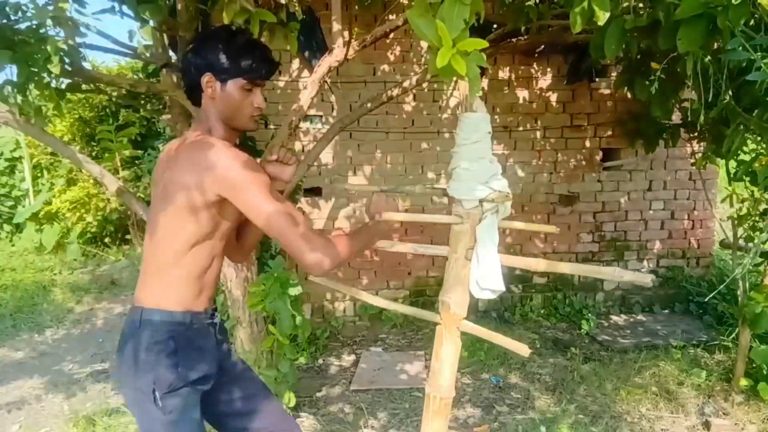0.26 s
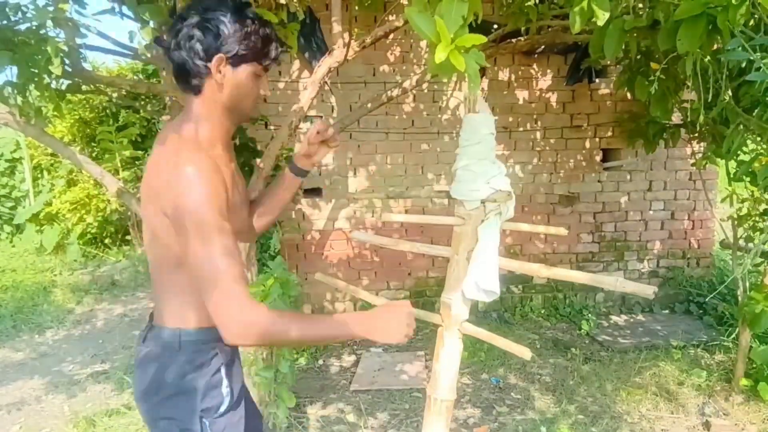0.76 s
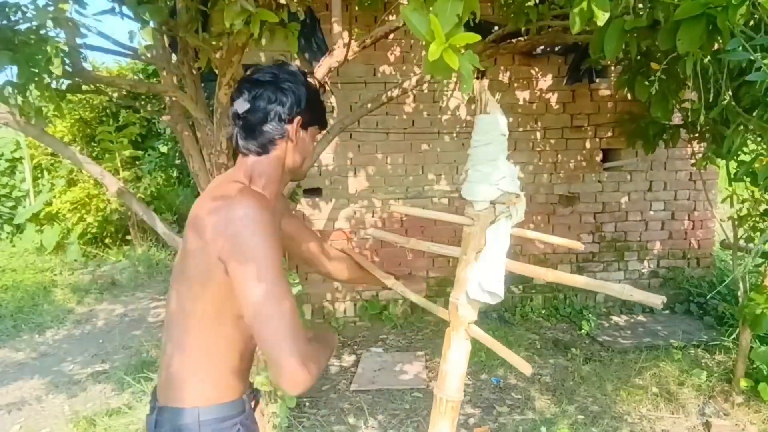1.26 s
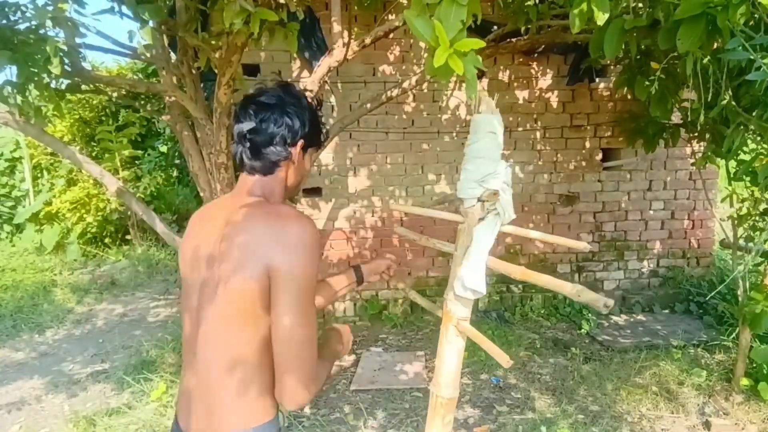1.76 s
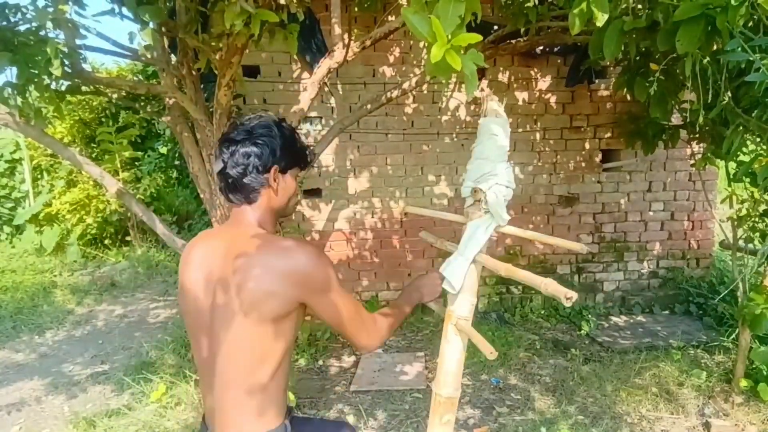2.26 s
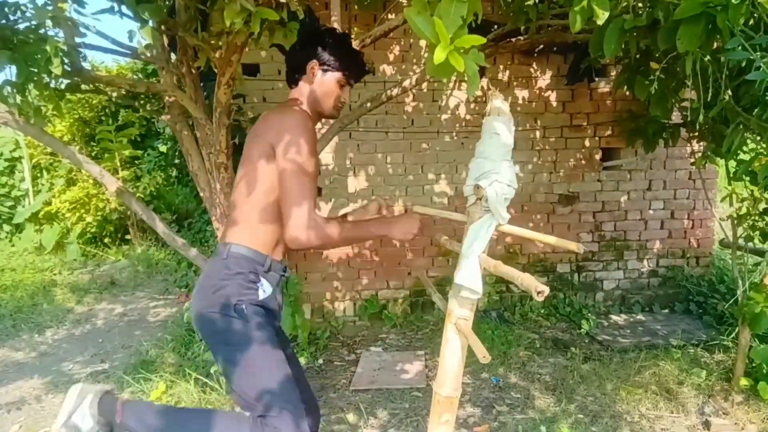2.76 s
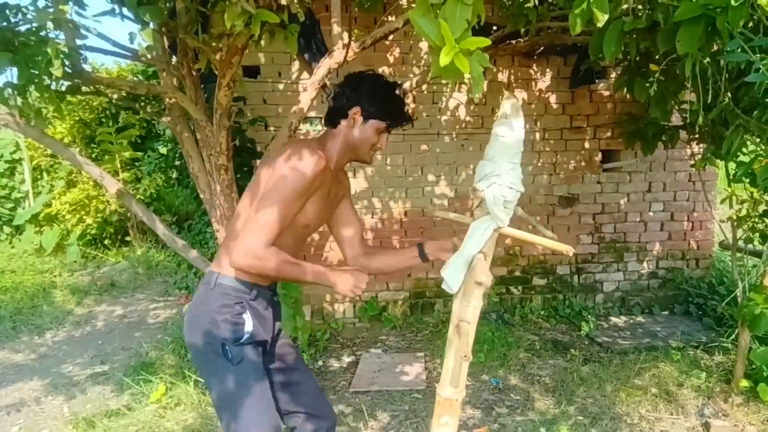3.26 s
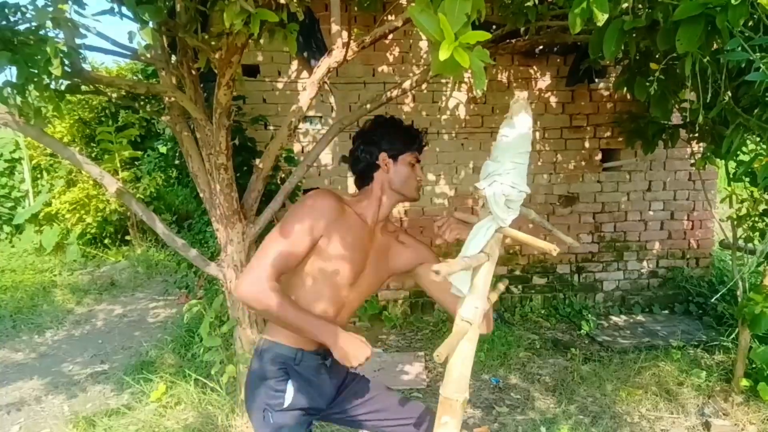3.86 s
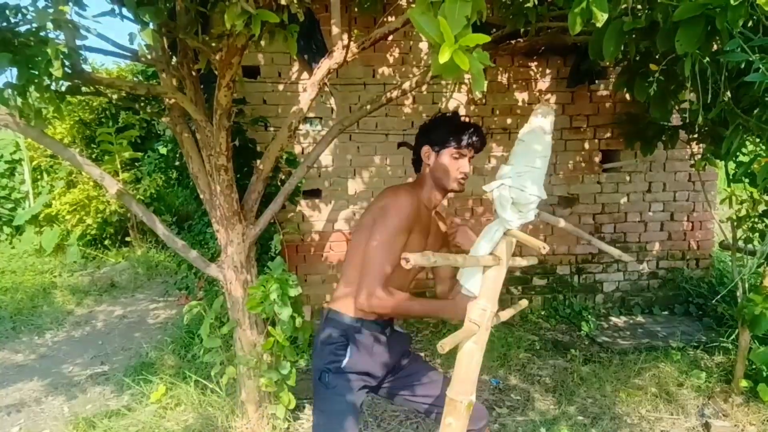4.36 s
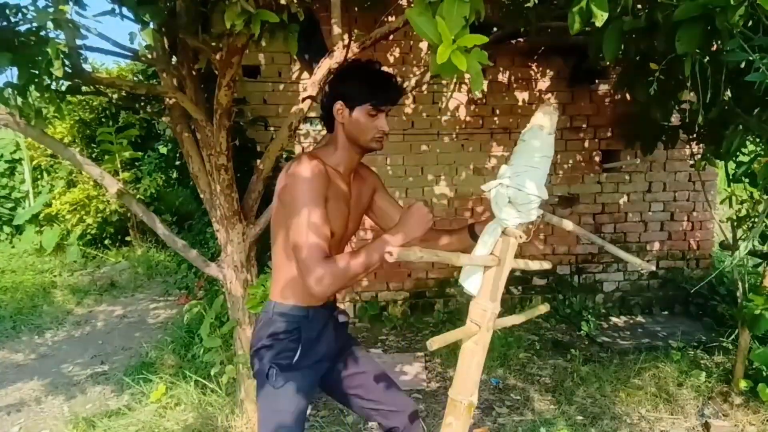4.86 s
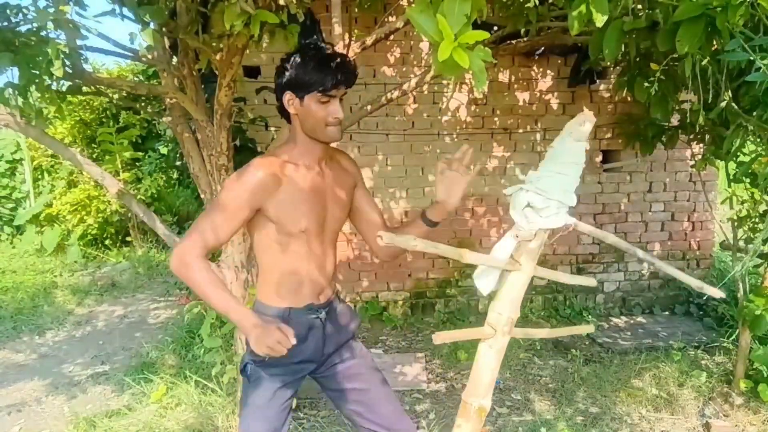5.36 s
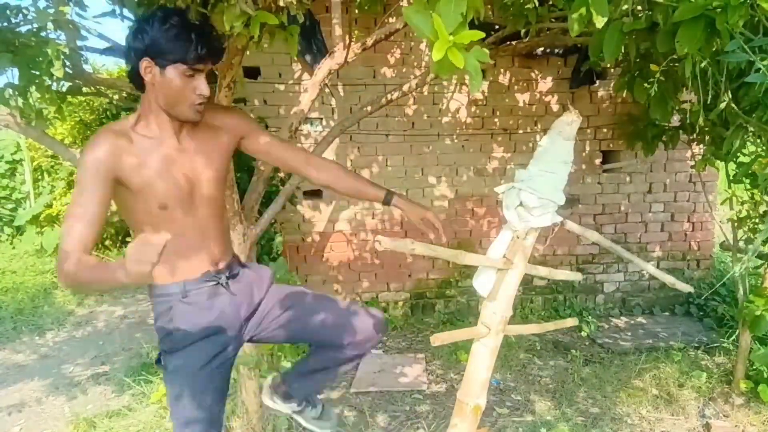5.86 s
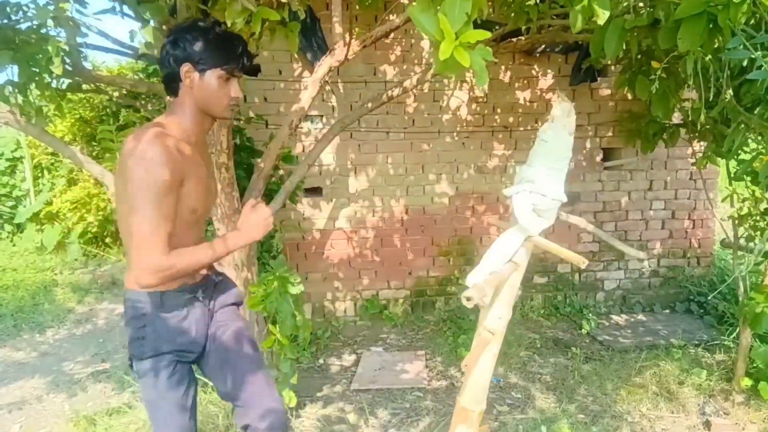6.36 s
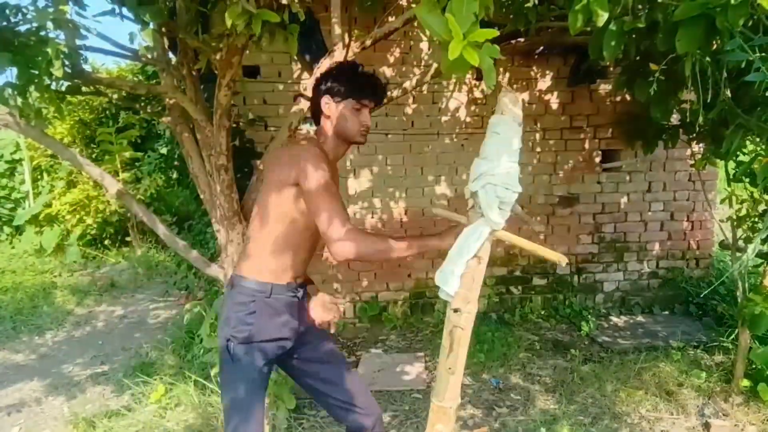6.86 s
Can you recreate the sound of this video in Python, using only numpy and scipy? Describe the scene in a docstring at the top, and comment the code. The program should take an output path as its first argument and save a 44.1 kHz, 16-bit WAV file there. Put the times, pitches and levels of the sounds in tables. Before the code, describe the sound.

Sharp dry wooden knocks and rattles come in quick uneven bursts outdoors, over fast high bird trills, cloth swishes and low wind rumble.

```python
"""Bamboo training dummy in a yard

A man strikes a bamboo dummy close to a brick wall: each push and its rattle ring a set of damped modes.
Between blows, feet and trousers swish through the grass as swells of coloured noise with sharp snaps.
Small birds repeat quick falling chirps, made of gliding sines, over the flickering noise bands of a far
bird chorus and a faint high hiss. A breeze buffets the microphone as lumpy low noise, separate at each port;
the right port is muffled."""
import sys
import numpy as np
from scipy import signal
from scipy.fft import rfft, irfft
from scipy.io import wavfile

SR = 44100
rng = np.random.default_rng(int(sys.argv[2]) if len(sys.argv) > 2 else 0)


def dump_mix(stems):
    """Bounce the given channels to the path in sys.argv[1] as a 16-bit WAV at rate SR."""
    frames = np.atleast_2d(stems).T  # one column per channel
    limited = np.clip(frames, -1, 1)  # hard clip at full scale
    pcm = np.round(limited * 32767).astype(np.int16)
    wavfile.write(sys.argv[1], SR, pcm)


N = 313992
TIME = np.arange(N) / SR


def from_db(db):
    """Decibels to gain."""
    return 10 ** (np.asarray(db) / 20)


def rms_one(x):
    """Scale to unit power."""
    return x / np.sqrt(np.mean(x ** 2) + 1e-20)


def unit_energy(x):
    """Scale to unit energy."""
    return x / np.linalg.norm(x)


def at_hz(points, hz):
    """Read a spectrum on a log-frequency axis."""
    known_hz, values = np.transpose(points)
    return np.interp(np.log(np.maximum(hz, 1)), np.log(known_hz), values)


def add(track, s, sound):
    """Mix a sound in from time s on."""
    start = max(int(round(s * SR)), 0)
    part = sound[:max(N - start, 0)]
    track[start:start + len(part)] += part


def drift(rate):
    """Random wander of unit power through `rate` new values per second."""
    knots = rng.standard_normal(4096)
    return rms_one(np.interp(TIME * rate, np.arange(len(knots)), knots))


def coloured(x, spectrum):
    """Causal (minimum-phase) filter with the given (f/Hz, level/dB) response."""
    size = 2048
    log_gain = np.log(from_db(at_hz(spectrum, np.fft.rfftfreq(size, 1 / SR))))
    cepstrum = irfft(log_gain)
    # fold the cepstrum onto positive time for minimum phase
    cepstrum[1:size // 2] *= 2
    cepstrum[size // 2 + 1:] = 0
    impulse = irfft(np.exp(rfft(cepstrum)))
    return signal.oaconvolve(x, impulse)[:len(x)]


def noise(spectrum, size=N):
    """Noise of unit power with the given spectrum."""
    run_in = 2048
    return rms_one(coloured(rng.standard_normal(size + run_in), spectrum)[run_in:])


def ring(t, hz, t60):
    """A struck mode: a decaying cosine of unit energy."""
    return unit_energy(np.cos(2 * np.pi * hz * t) * from_db(-60 * t / t60))


def scatter(t, t60, onset_s):
    """Dense reflections of unit energy that swell briefly and die away."""
    decay = from_db(-60 * t / t60)
    swell = 1 - np.exp(-t / onset_s)
    return unit_energy(rng.standard_normal(len(t)) * decay * swell)


# modes of the post and its arms: f/Hz, level/dB (relative), t60/s
BAMBOO_MODES = [(272, 0, 0.06), (353, -0.5, 0.023), (459, 0.5, 0.027), (656, -13, 0.064),
                (720, -5.5, 0.029), (1050, -1, 0.017), (1160, -14.5, 0.011), (1332, -7.5, 0.05),
                (1455, -17, 0.024), (1943, -3.5, 0.011), (2790, 4, 0.0049)]


def struck_bamboo(note_hz, ring_db, rattle_db, t):
    """The struck part's note, its bending overtones and the fixed modes of the dummy answer a sharp push."""
    modes_db, overtone_db = -17, -7
    # an arm that the hand leaves at once rings louder and, up to -5 dB, longer
    t60 = 0.11 * from_db(0.69 * min(ring_db, -5))
    push = 1.0 * (t == 0)
    body = push + from_db(ring_db) * ring(t, note_hz, t60)
    # the higher the bending mode, the sooner it dies
    for ratio in (1.77, 2.8, 3.73):
        overtone_hz = ratio * note_hz
        body += from_db(ring_db + overtone_db) * ring(t, overtone_hz, t60 * 1300 / overtone_hz)
    for hz, db, mode_t60 in BAMBOO_MODES:
        body += from_db(modes_db + db + rng.normal(0, 1.17)) * ring(t, hz, mode_t60)
    return body


def contact_force(rattle_db, t):
    """A push, its rattle in the socket and the knock of the loose arm coming back."""
    # a glancing blow scuffs and rattles for longer than a square one
    scuff_t60 = 0.051 * from_db(0.57 * rattle_db)
    force = 1.0 * (t == 0) + from_db(rattle_db) * scatter(t, scuff_t60, onset_s=.0013)
    # the loose arm knocks back against its socket a few milliseconds later
    rebound_s = .008 * rng.uniform(0.692, 1.3)
    force += from_db(-12 + .5 * rattle_db) * np.sinc((t - rebound_s) * SR)
    return unit_energy(force)


# what ground, wall and leaves throw back: f/Hz, level/dB
REFLECTED_COLOUR = [(200, 0), (1200, -2.5), (3000, -2), (6000, 0), (12000, -31)]


def surroundings(t):
    """One early bounce off the ground, the swelling return of the wall and a longer tail, all duller."""
    ground_s = .0045 * rng.uniform(0.737, 1.7)
    echoes = from_db(-10) * np.sinc((t - ground_s) * SR)
    echoes += from_db(-12) * scatter(t, t60=0.09, onset_s=0.036)
    echoes += from_db(-19) * scatter(t, t60=0.27, onset_s=0.0066)
    return coloured(echoes, REFLECTED_COLOUR)


def blow(note_hz, ring_db, rattle_db):
    """The contact force and its reflections set the bamboo ringing."""
    t = np.arange(2 ** 14) / SR
    body = struck_bamboo(note_hz, ring_db, rattle_db, t)
    excitation = contact_force(rattle_db, t) + surroundings(t)
    return signal.fftconvolve(body, excitation)[:len(t)]


def contact(centre_hz, rise_db, fall_db):
    """Contact spectrum: bone peaks high and falls steeply, a palm or sole slaps broadly (f/Hz, level/dB)."""
    # the light poles radiate little bass: corner (Hz), loss below it (dB per octave)
    radiation_hz, radiation_loss_db = 250, 12
    hz = np.geomspace(40, 16000, 64)
    octaves = np.log2(hz / centre_hz)
    db = rise_db * np.minimum(octaves, 0) - fall_db * np.maximum(octaves, 0)
    db += radiation_loss_db * np.minimum(np.log2(hz / radiation_hz), 0)
    return np.transpose([hz, db])


# blows on the dummy: t/s, level/dB, struck part's note f/Hz, its ring level/dB, rattle and scuff level/dB,
# contact's corner f/Hz, slope below it [dB per octave, rising], slope above it [dB per octave, falling]
DUMMY_BLOWS = [(.232, -42, 807, -9, -4, 1530, 4, 6.5), (0.3076, -22.5, 726, 3, -10, 2900, 0.5, 18),
               (.665, -27.5, 650, -14.5, -0.5, 520, 14, 10.5), (0.9351, -27.5, 740, -19, 0.5, 1250, 0, 11),
               (1.309, -40, 467, -13, -1, 4410, 5.5, 11), (1.548, -34, 513, -22, 4, 530, 8, 7.5),
               (1.8499, -21, 2057, -9.5, -13.5, 3260, 7, 34), (2.035, -20.3, 1280, -22, -5, 1330, 10, 16.5),
               (2.2257, -23, 2020, -21.5, -2, 2080, 8.5, 23), (2.3761, -23.5, 1320, -17, -5, 1570, 11, 17),
               (2.5592, -22.5, 1834, -9.5, -6, 2320, 3, 24), (2.7177, -28.5, 926, -13, -2.5, 1900, 6.5, 28),
               (2.942, -25.5, 1790, -10.5, 5.5, 2290, 4, 24),
               (3.1576, -31.5, 710, -17, -1.5, 1960, 3.5, 24), (3.3896, -25, 1690, -17, 6, 1970, 6.5, 30),
               (3.458, -34.5, 530, -13, -1.5, 3900, -3.5, 8), (3.593, -31.5, 1792, -13, -2, 1770, 7, 29),
               (3.6905, -41.5, 1080, -9.5, -6, 3230, -.5, 32), (3.8968, -42.5, 1123, -15, 9, 2670, -1, 9),
               (4.1782, -23.5, 463, -14, 3.5, 990, -1.5, 9.5), (4.905, -35.5, 1160, -2, 12.5, 3000, -2, 17),
               (4.98, -40.5, 1720, -12, -9, 1730, 3.5, 17), (5.06, -37.5, 1170, -7, 1.5, 1400, -2, 8),
               (5.296, -32.5, 1146, -5, 5, 3970, -3.5, 10.5), (5.585, -23, 466, -16, -4.5, 2670, -3.5, 9.5),
               (6.1463, -20.5, 840, -18.5, -7, 915, 9.5, 9.5), (6.2276, -33.5, 1200, -3, 1, 880, 8, 10),
               (6.738, -41.5, 565, -14, 2, 2000, -3, 21), (6.996, -32.5, 710, -12, 12.5, 1770, 2.5, 19)]


def dummy():
    """All the blows, each coloured by its contact and set to its own energy."""
    level_span_s = .03  # a blow's level is its energy spread over this time
    out = np.zeros(N)
    for s, db, note_hz, ring_db, rattle_db, centre_hz, rise_db, fall_db in DUMMY_BLOWS:
        sound = coloured(blow(note_hz, ring_db, rattle_db), contact(centre_hz, rise_db, fall_db))
        add(out, s, from_db(db) * np.sqrt(level_span_s * SR) * unit_energy(sound))
    return out


# feet and cloth: middle t/s, half length t/s, level/dB (before the trim), treble tilt [dB per octave]
MOVES = [(0.245, 0.0089, -42, -3), (0.292, 0.018, -38, -3.5), (0.494, 0.18, -50, 5),
         (0.621, 0.058, -41.5, 5), (0.977, 0.0088, -43, 7), (1.326, 0.0065, -32.5, -2),
         (1.581, 0.047, -40, -0.5), (1.67, 0.07, -40, 3), (1.773, 0.019, -31, 3), (1.81, 0.029, -36.5, 1.5),
         (2.586, 0.022, -33.5, -2), (2.647, 0.04, -37, 2.5), (2.783, 0.075, -43, -3),
         (3.057, 0.038, -45, 2), (3.177, 0.022, -39, -1), (3.464, 0.02, -35.5, 0),
         (3.931, 0.025, -39, -3.5), (4.072, 0.02, -48, 7), (4.207, 0.03, -43.5, 2.5),
         (4.524, 0.043, -41.5, 0.5), (4.609, 0.075, -40.5, 4.5), (4.728, 0.032, -46, -0.5),
         (5.008, 0.027, -50, 8), (5.045, 0.058, -39, 1), (5.607, 0.026, -42.5, 4),
         (6.064, 0.076, -45.5, 0.5), (6.247, 0.027, -28.5, -2.5), (6.371, 0.094, -41.5, 0.5),
         (6.484, 0.0033, -38, 2.5)]
# friction of cloth and grass before the tilt: f/Hz, level/dB per Hz
FRICTION_COLOUR = [(200, 0.5), (500, 3), (1200, 3.5), (2400, 2.5), (4200, -3), (6000, -13), (9000, -16.5),
                   (15000, -31)]


def swishes(snaps_per_s=130, snap_db=22, clump_db=1.0, trim_db=-2):
    """Cloth and grass give a swell of friction with each move, dotted with the snaps of single blades."""
    out = np.zeros(N)
    for s, half_s, db, tilt in MOVES:
        lag = (TIME - s) / half_s
        lag = lag[abs(lag) < 2.5]
        size = len(lag)
        friction, snap_sizes = rng.standard_normal((2, size))
        snaps = from_db(snap_db) * snap_sizes * (rng.random(size) < snaps_per_s / SR)
        # the fabric catches and lets go, so the friction comes in clumps
        friction = friction * from_db(clump_db * drift(120)[:size])
        colour = [(hz, level + tilt * np.log2(hz)) for hz, level in FRICTION_COLOUR]
        swell = np.exp(-lag ** 2)
        sound = rms_one(coloured(friction + snaps, colour)) * swell
        add(out, s - size / SR / 2, from_db(db + trim_db) * sound)
    return out


def note(peak_s, length_s, start_hz, end_hz, db, bend=0.96, waver=0.0069, skew=0.97):
    """A whistle gliding between two pitches (skew under 1: quick attack); returns start time and sound."""
    u = np.linspace(0, 1, int(length_s * SR))
    hz = end_hz + (start_hz - end_hz) * (1 - u) ** bend
    hz = hz * (1 + waver * np.interp(u, np.linspace(0, 1, 8), rng.standard_normal(8)))
    swell = np.sin(np.pi * u ** skew)
    start_s = peak_s - length_s * .5 ** (1 / skew)
    return start_s, from_db(db) * swell * np.sin(2 * np.pi * np.cumsum(hz) / SR)


def trill(s, hz, db, gap_s=.0318, length_s=.021, fall=0.0948, uneven_db=0.5):
    """Three quick falling notes of uneven strength, the last at time s."""
    notes = []
    # counted back from the last note
    for k, weaker_db in enumerate((0, -.7, -2.5)):
        note_db = db + weaker_db + rng.normal(0, uneven_db)
        notes.append(note(s - k * gap_s, length_s, hz * (1 + fall), hz * (1 - fall), note_db, waver=0.0082))
    return notes


def low_chirp(s, gap, opening_db):
    """A short opening note, mostly weaker, then two longer notes that drop fast and flatten out."""
    notes = [note(s - 1.8 * gap, 0.026, 3426, 3062, opening_db, bend=1.94, skew=0.77)]
    for at in (s - gap, s):
        notes.append(note(at, 0.042, 3450, 3040, -31, bend=2.97, waver=0.011, skew=0.597))
    return notes


def far_trills():
    """More of the same trills from further off, one at a random moment in each of 80 equal slots."""
    notes = []
    draws = rng.random((80, 3))
    for i, (delay, pitch, loudness) in enumerate(draws):
        s = (i + delay) * TIME[-1] / len(draws)
        notes += trill(s, 5950 + 650 * pitch, -45.5 + 4 * loudness)
    return notes


# lower three-note chirps: last note t/s, spacing t/s, opening note's peak level/dB
LOW_PHRASES = [(0.698, 0.064, -45), (1.007, 0.058, -40), (1.306, 0.063, -34.5), (1.599, 0.057, -38),
               (1.813, .05, -52), (2.12, 0.063, -39), (2.43, 0.067, -32), (3.187, 0.059, -39.5),
               (3.47, 0.058, -36), (3.772, 0.061, -35.5), (4.336, .066, -33.5), (4.613, .057, -36.5),
               (4.898, .063, -34.5), (5.619, .070, -29.5), (5.955, 0.054, -37), (6.257, 0.067, -33),
               (6.578, 0.058, -38), (6.805, 0.043, -55), (7.101, 0.059, -37)]
# distant whistles: middle t/s, length t/s, start f/Hz, end f/Hz, peak level/dB
LONE_WHISTLES = [(1.113, 0.13, 2670, 2140, -50), (1.466, 0.12, 2910, 2270, -49),
                 (1.971, .07, 2870, 2790, -44.5), (3.262, 0.1, 3120, 2320, -51),
                 (5.24, .08, 2680, 2910, -48), (5.462, .12, 3530, 4020, -50),
                 (5.526, 0.052, 2610, 2870, -40), (5.947, 0.096, 2530, 2910, -39),
                 (6.116, 0.29, 1313, 1395, -49), (6.36, 0.085, 2610, 2890, -42),
                 (6.424, .44, 1395, 1300, -48)]
# two singers of the high trill, each at its own pitch and pace: f/Hz, peak level/dB, last notes t/s [list]
TRILL_SINGERS = [(6580, -30.5, [.549, 1.073, 1.533, 2.076, 2.628, 3.174, 3.582, 4.143, 4.716, 5.324, 5.811, 6.315, 6.861]),
                 (6000, -35.5, [.353, 0.826, 1.265, 1.587, 1.978, 2.276, 2.65, 3.116, 3.634, 4.059, 4.471, 4.869, 5.327, 5.699, 6.053, 6.519, 6.97])]


def birds(foliage_db=-8):
    """Three-note phrases and lone whistles, scattered by the leaves."""
    notes = [note(*whistle, waver=0.0154) for whistle in LONE_WHISTLES]
    for phrase in LOW_PHRASES:
        notes += low_chirp(*phrase)
    for hz, db, times in TRILL_SINGERS:
        for s in times:
            notes += trill(s, hz, db)
    notes += far_trills()
    out = np.zeros(N)
    for start_s, sound in notes:
        add(out, start_s, sound)
    leaves = scatter(TIME[:SR // 2], t60=0.11, onset_s=0.018)
    return out + from_db(foliage_db) * signal.oaconvolve(out, leaves)[:N]


# breeze strength at the left, then the right port: t/s, level/dB (before the trim)
LEFT_FLOW = [(0, -18.5), (.25, -27.5), (.42, -31), (.68, -28), (.95, -32), (1.2, -30.5), (1.8, -29),
             (1.95, -36.5), (2.7, -34.5), (3.1, -32), (3.35, -39), (4.2, -38.5), (4.45, -45), (4.8, -37.5),
             (5.15, -40.5), (5.4, -41), (6.3, -35), (7.1, -46)]
RIGHT_FLOW = [(0, -39), (.45, -53.5), (1.5, -49), (1.75, -38), (2.1, -44.5), (2.55, -37.5), (2.85, -46),
              (3.15, -46.5), (3.95, -56.5), (4.55, -41.5), (4.95, -31), (5.25, -44), (5.9, -38.5),
              (6.15, -43.5), (6.35, -33), (6.65, -47), (7.1, -37)]
# short gusts: t/s, port [0 left, 1 right], peak level/dB (before the trim)
SHORT_GUSTS = [(.16, 0, -25.5), (1.25, 0, -28.5), (1.45, 0, -25.5), (1.72, 0, -29), (1.99, 0, -32.5),
               (4.669, 0, -28.5), (4.789, 1, -25), (5.8, 1, -33.5), (6.52, 0, -29.5), (7.03, 1, -31.5)]
# turbulence at the left and right port, one list each: f/Hz, level/dB per Hz
TURBULENCE_COLOURS = [
    [(25, -31.5), (40, -23.5), (60, -4.5), (98, 0.5), (140, -3.5), (200, -11.5), (300, -22), (500, -41),
     (1000, -67)],
    [(25, -41.5), (40, -11), (60, 3.5), (90, 5.5), (140, -2.5), (200, -16), (300, -28), (500, -30),
     (1000, -92)],
]
# eddies that a strong gust adds: f/Hz, level/dB per Hz
EDDY_COLOUR = [(80, -38), (160, 3.5), (220, 1.5), (320, -9.5), (500, -17.5), (1000, -49)]


def wind(lump_db=2.5, lumps_per_s=25, trim_db=-0.5, eddy_db=7, eddy_growth=1.903):
    """Lumpy turbulence, separate at each port; stronger gusts also shed smaller, higher eddies."""
    gust_s = 0.066  # from the peak of a gust to a quarter of its amplitude
    out = []
    for port, (breeze, colour) in enumerate(zip((LEFT_FLOW, RIGHT_FLOW), TURBULENCE_COLOURS)):
        flow = from_db(np.interp(TIME, *np.transpose(breeze)))
        for s, side, db in SHORT_GUSTS:
            if round(side) == port:
                gust = from_db(db) / (1 + ((TIME - s) / gust_s) ** 2) ** 2
                flow = np.hypot(flow, gust)
        flow_db = 20 * np.log10(flow) + trim_db + lump_db * drift(lumps_per_s)
        # eddies grow almost twice as fast in dB as the flow
        eddies = from_db(eddy_db + eddy_growth * flow_db) * noise(EDDY_COLOUR)
        out.append(from_db(flow_db) * noise(colour) + eddies)
    return np.array(out)


# outdoor hush: f/Hz, level/dB per Hz
HUSH_COLOUR = [(150, 9.5), (400, 5), (800, 2.5), (1500, 0), (2800, -4.5), (3800, -7), (5000, -14.5),
               (7800, -14), (10000, -15.5), (12000, -22), (15000, -32)]
# far bird chorus and a faint high hiss: f/Hz, width f/Hz, rms level/dB (before flutter), flutter [dB]
CHORUS_BANDS = [(2960, 480, -58.5, 4), (5990, 760, -55.5, 3.5), (6540, 790, -54.5, .5),
                (10600, 630, -68, -0.5)]


def yard(hush_db=-48.0):
    """The slowly wavering outdoor hush, with fluttering noise bands for a far bird chorus and a faint high hiss."""
    out = from_db(hush_db + 1.4 * drift(2.3)) * noise(HUSH_COLOUR)
    for hz, width_hz, db, flutter_db in CHORUS_BANDS:
        edges = [hz - width_hz / 2, hz + width_hz / 2]
        band = signal.butter(2, edges, "band", fs=SR, output="sos")
        band_noise = rms_one(signal.sosfilt(band, rng.standard_normal(N)))
        out += from_db(db + flutter_db * drift(40)) * band_noise
    return out


# response of the muffled right port: f/Hz, level/dB
MUFFLED_PORT = [(100, 4), (250, -6), (500, -13), (1000, -17), (2000, -23), (3200, -30), (6500, -34),
                (15000, -32)]


def muffled_port(near, far, far_db=-2, hiss_db=-58, diffuse_db=-8):
    """The right port hears everything dully and less directly, over its own soft hiss."""
    right = coloured(near + from_db(far_db) * far, MUFFLED_PORT)
    smear = scatter(TIME[:SR // 8], t60=0.11, onset_s=0.0027)
    right = right + from_db(diffuse_db) * signal.oaconvolve(right, smear)[:N]
    hiss_colour = [(300, 1.5), (1500, -4.5), (3300, -9.5), (5000, -19.5), (15000, -37.5)]
    return right + from_db(hiss_db) * noise(hiss_colour)


def scene():
    """Blows, swishes, birds and yard reach the left port clearly and the right one muffled, with wind on both."""
    near = dummy() + swishes()
    far = birds() + yard()
    return np.array([near + far, muffled_port(near, far)]) + wind()


def record(dry):
    """The deepest rumble is cut, peaks stop at full scale and the top is cut."""
    high_pass = signal.butter(4, 36, "high", fs=SR, output="sos")
    low_pass = signal.ellip(10, .1, 80, 15600, fs=SR, output="sos")
    x = signal.sosfilt(high_pass, dry)
    return signal.sosfilt(low_pass, np.clip(x, -1, 1))


dry = scene()
out = record(dry)
dump_mix(out)
```